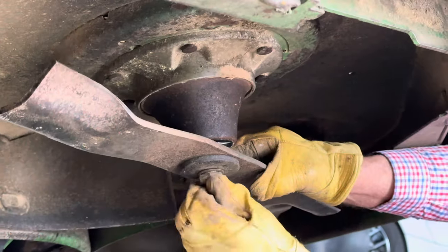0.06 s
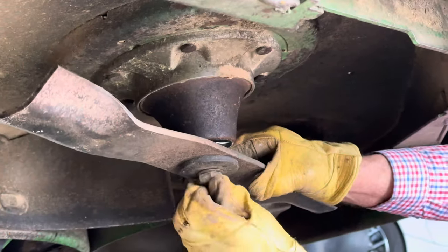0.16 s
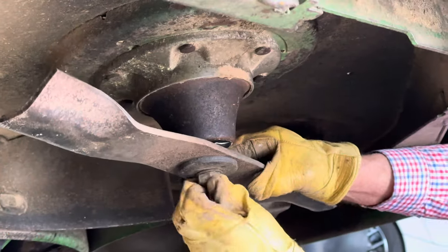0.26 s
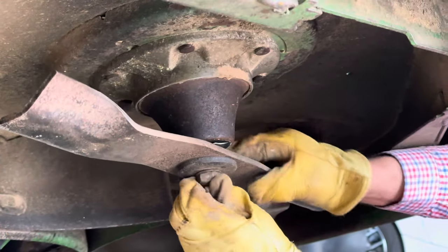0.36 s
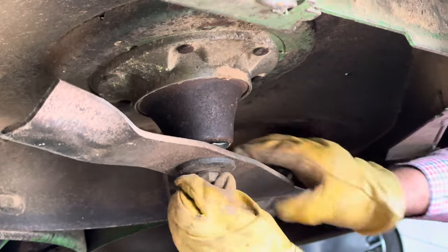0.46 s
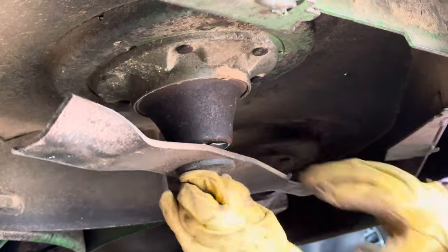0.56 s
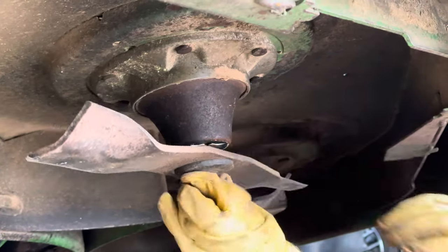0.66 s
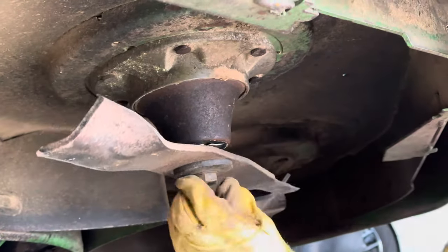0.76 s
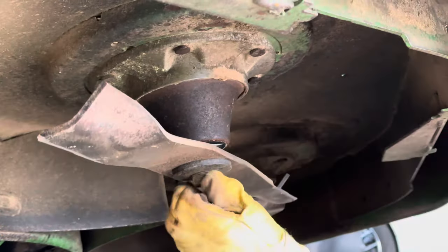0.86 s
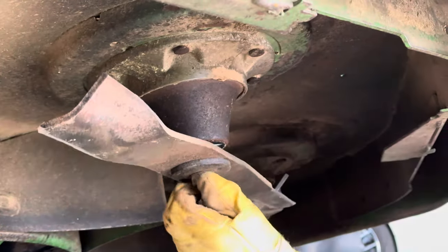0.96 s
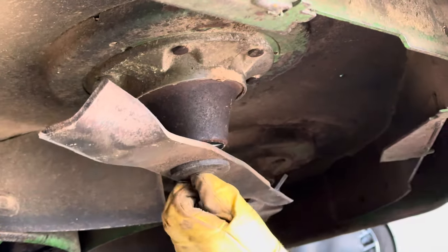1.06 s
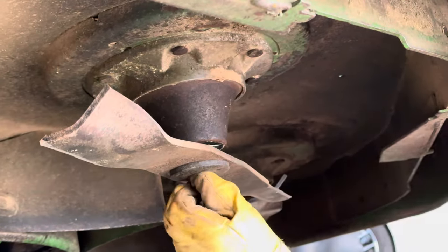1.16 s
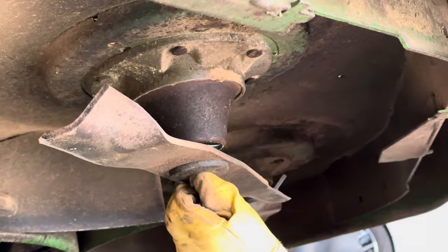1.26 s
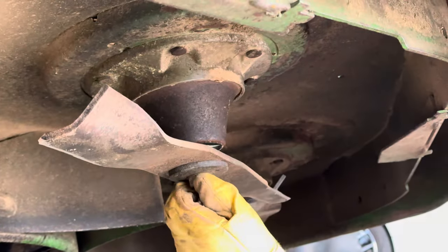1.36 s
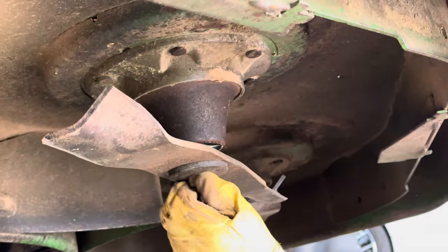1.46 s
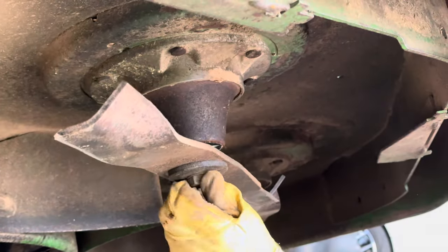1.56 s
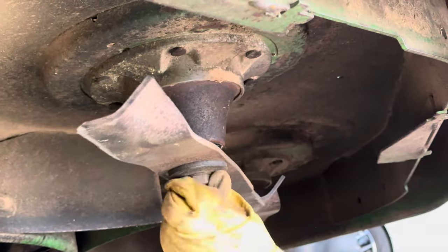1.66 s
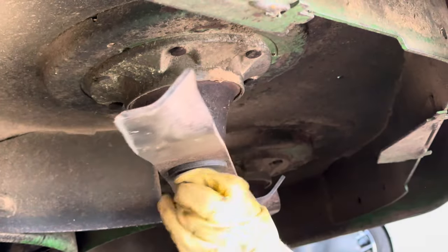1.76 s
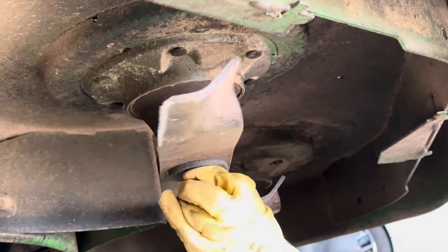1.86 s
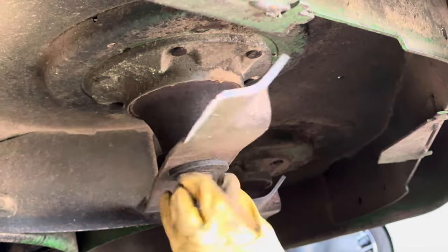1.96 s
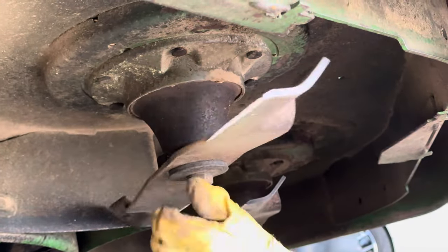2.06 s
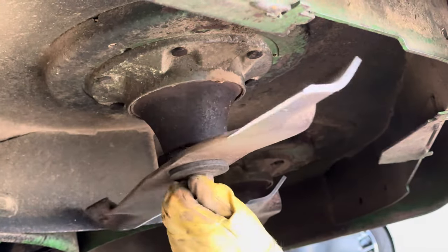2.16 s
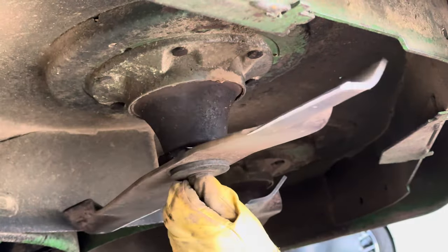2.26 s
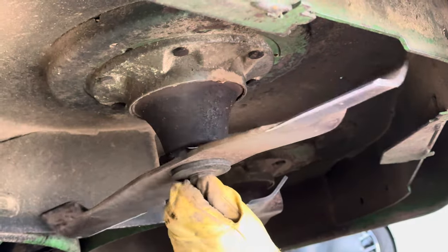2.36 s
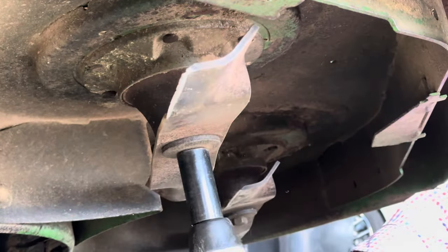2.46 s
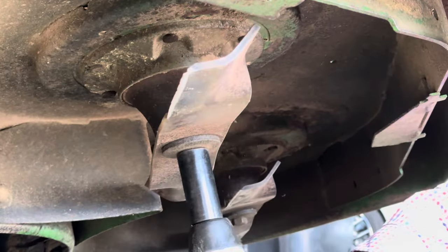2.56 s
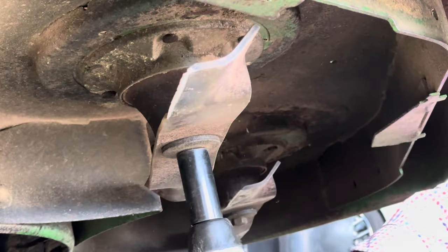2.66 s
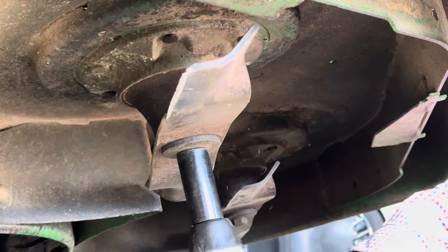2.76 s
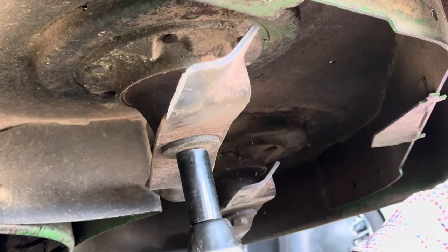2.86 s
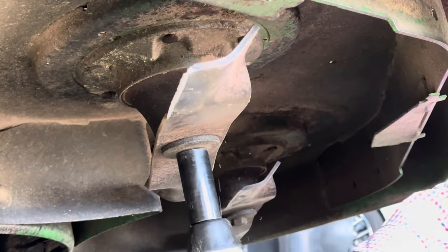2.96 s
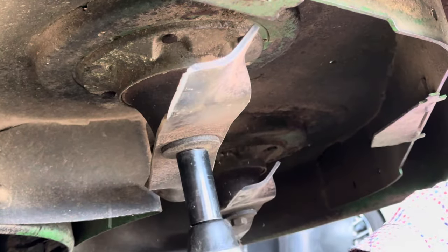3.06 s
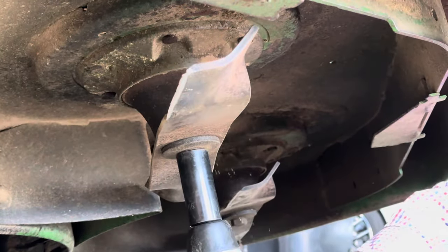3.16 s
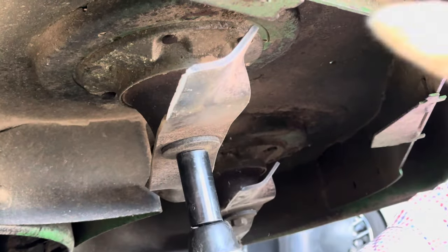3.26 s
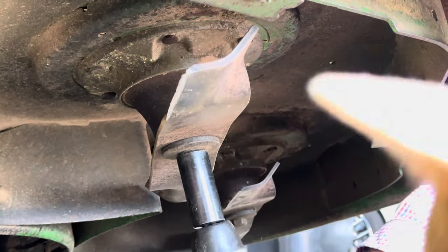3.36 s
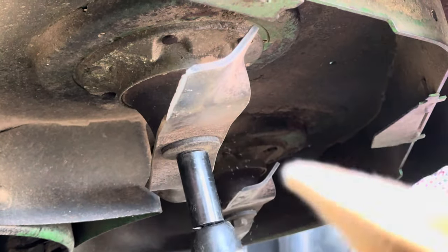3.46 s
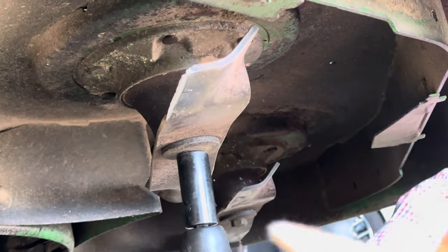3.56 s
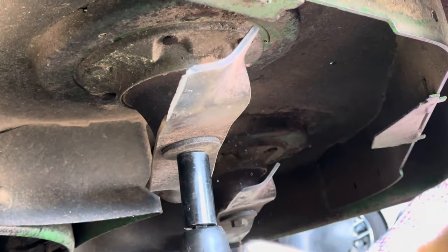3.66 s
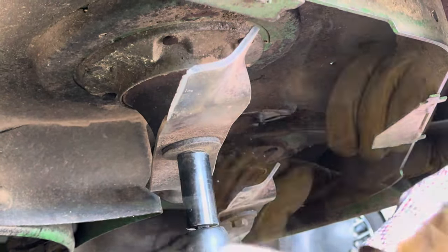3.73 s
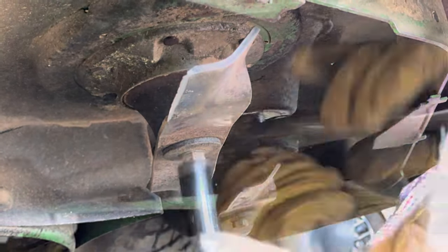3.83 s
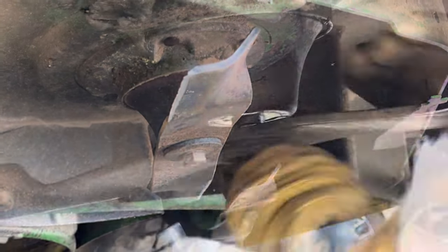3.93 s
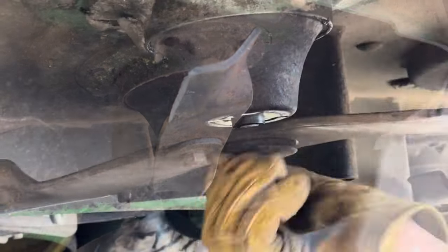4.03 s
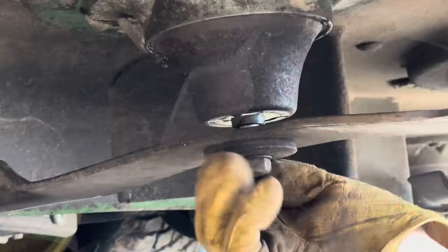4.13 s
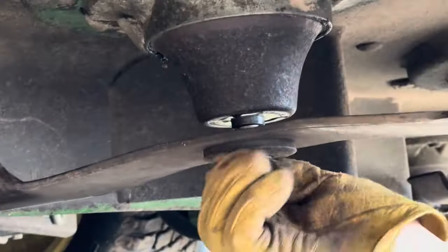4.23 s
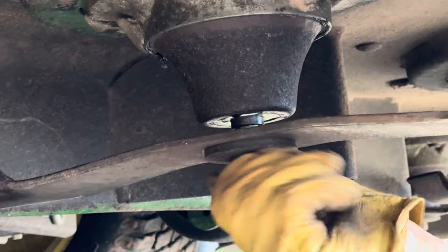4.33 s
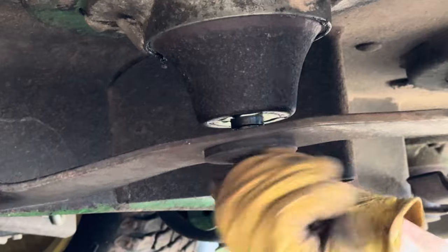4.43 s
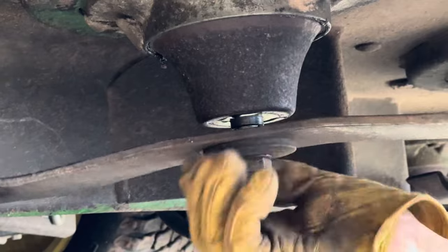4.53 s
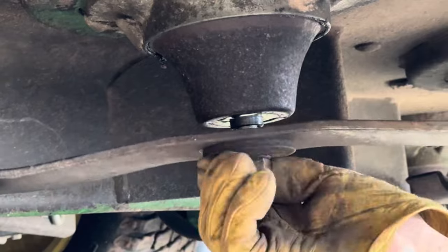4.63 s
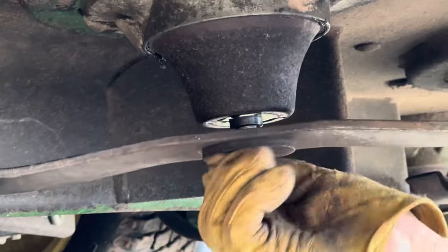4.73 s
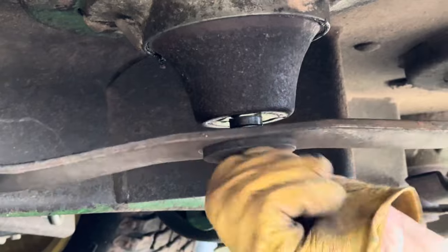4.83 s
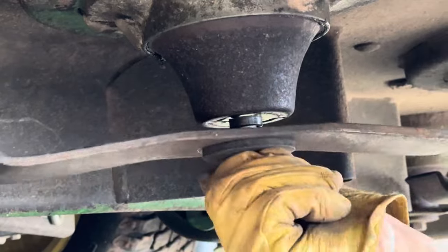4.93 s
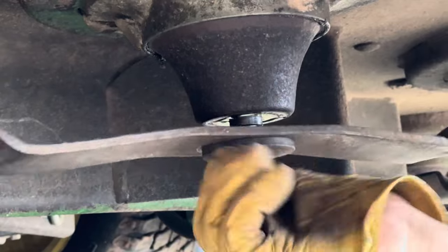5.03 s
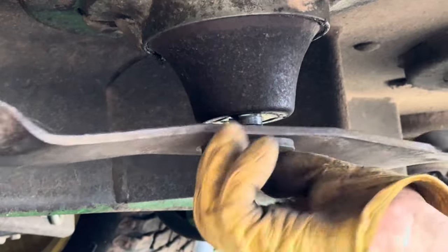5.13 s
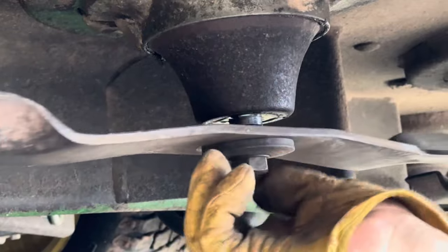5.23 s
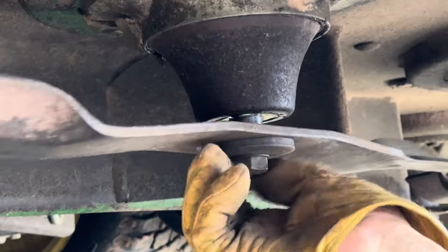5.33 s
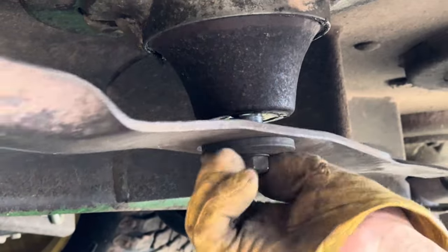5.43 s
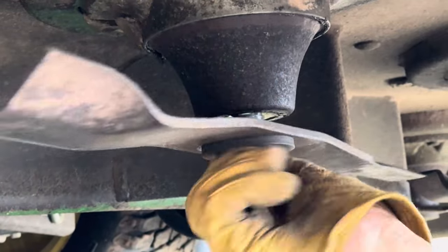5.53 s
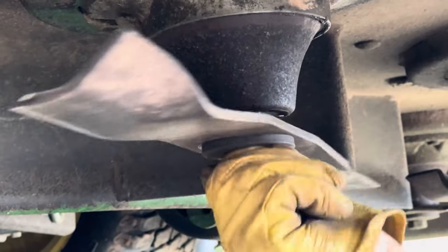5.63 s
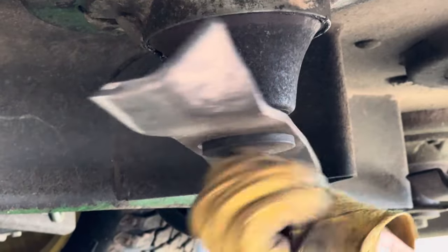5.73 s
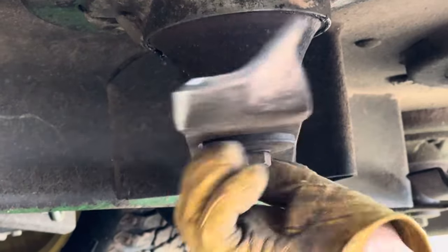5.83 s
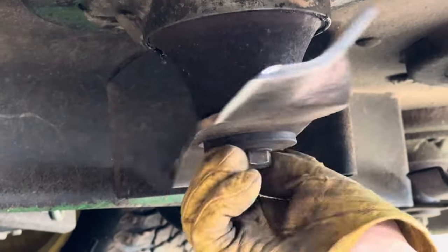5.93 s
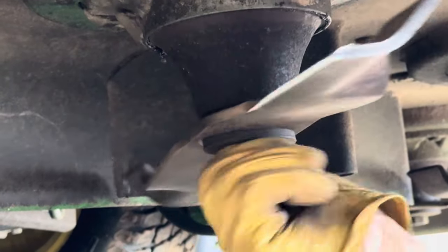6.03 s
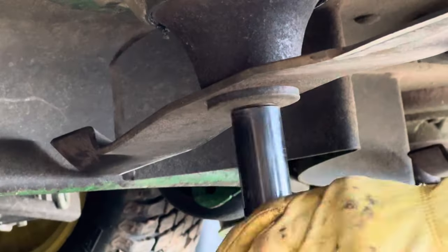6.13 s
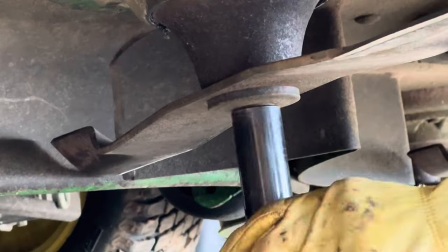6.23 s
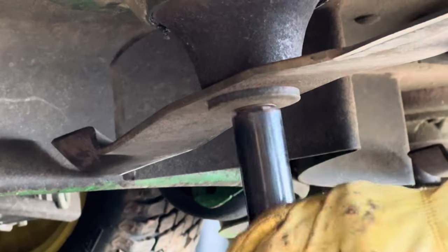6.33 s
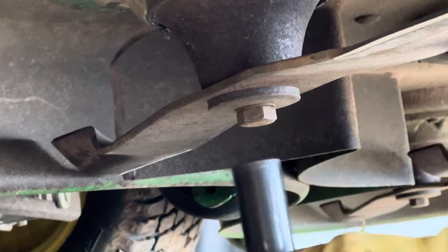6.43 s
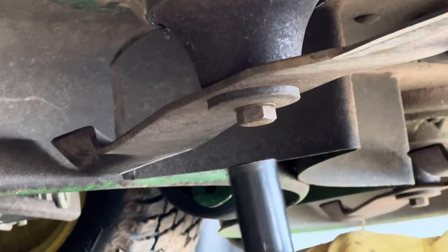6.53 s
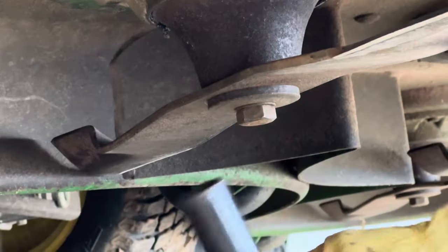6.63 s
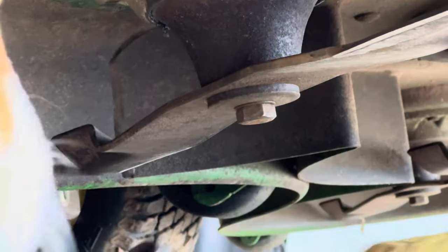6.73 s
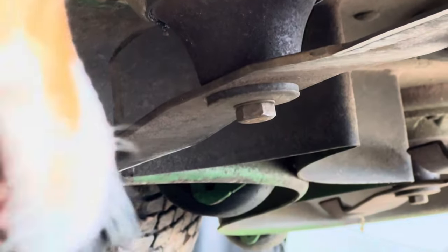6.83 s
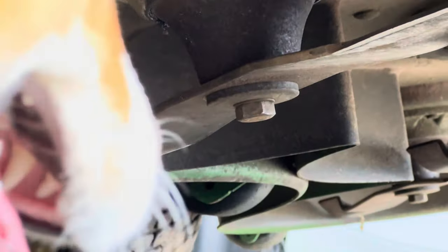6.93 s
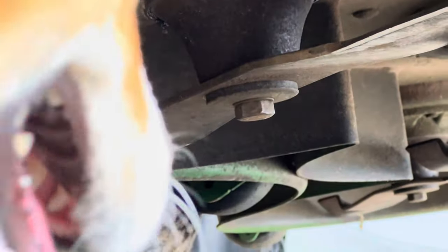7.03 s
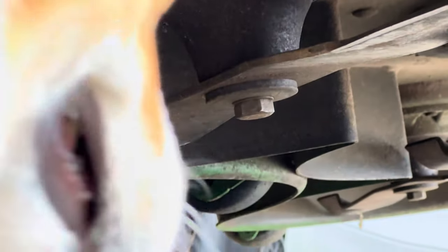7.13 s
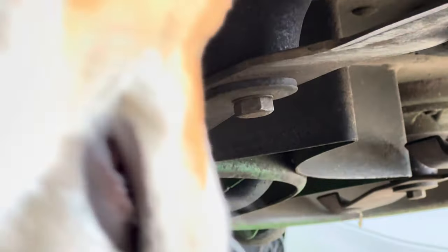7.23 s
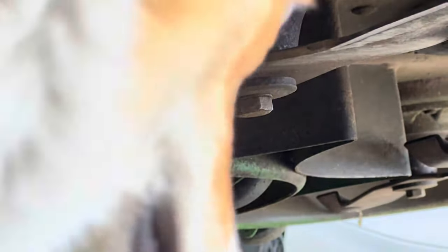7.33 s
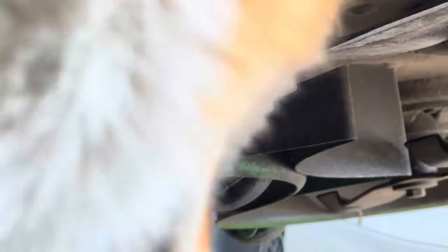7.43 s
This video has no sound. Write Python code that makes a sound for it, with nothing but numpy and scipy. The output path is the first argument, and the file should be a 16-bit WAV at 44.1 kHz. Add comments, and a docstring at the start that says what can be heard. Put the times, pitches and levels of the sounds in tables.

```python
"""Gloved hands rub and bump under a mower deck in a farm workshop, threading on two blade bolts one after the other.
Friction is random stick-slip clicks; the blades scrape and ring, padded knocks and steel clicks are decaying noise.
An air impact wrench tightens each bolt: its vane motor puffs and hisses, stalls at every hammer blow, and socket and
deck ring as decaying sines. The socket clicks off, a dog brushes up to the microphone, and the building echoes.
A low rumble lies under the threading, and a faint bed of outdoor air under everything."""
import sys
import numpy as np
from scipy import signal
from scipy.fft import rfft, irfft, next_fast_len
from scipy.io import wavfile
from scipy.ndimage import uniform_filter1d

SR = 44100
rng = np.random.default_rng(int(sys.argv[2]) if len(sys.argv) > 2 else 0)


def to_wav(s):
    """Save 16-bit WAV."""
    ch = np.atleast_2d(s).T  # columns
    pcm = np.round(np.clip(ch, -1, 1) * 32767)  # PCM
    wavfile.write(sys.argv[1], SR, pcm.astype(np.int16))


N = 330309
TIME = np.arange(N) / SR
AGE = TIME[:SR]  # one second, the time since a strike

# trigger pulls of the wrench: (open [s], close [s], first blow [s], blow rate [1/s], then relative levels:
# exhaust [dB], hiss [dB], rattle [dB], socket ring [dB], deck ring [dB])
PULLS = [(2.474, 3.076, 2.4905, 17.3, -2.5, -8, 1.5, -13.5, -20.5),
         (6.175, 6.3, 6.2306, 16.7, -3, -3, -1.5, -21, -29)]
# colour of a bright tap on steel: (frequency [Hz], relative level [dB])
TAP_COLOUR = [(500, -18.5), (2000, -1), (2800, 7), (4000, -5.5), (7000, -9), (15000, -22.5)]


def undb(db):
    """Decibels to gain."""
    return 10 ** (np.asarray(db) / 20)


def unit(x):
    """Scale to rms 1."""
    return x / np.sqrt(np.mean(x ** 2))


def noise():
    """White noise, rms 1."""
    return rng.standard_normal(N)


def curve(rows):
    """Levels of a table (time [s], level [dB]) joined by straight lines."""
    s, level = np.transpose(rows)
    return np.interp(TIME, s, level)


def during(rows):
    """One while a table of times lasts, zero outside."""
    return 1. * ((TIME > rows[0][0]) & (TIME < rows[-1][0]))


def fade(t60):
    """One second of exponential decay, falling 60 dB in t60 seconds."""
    return np.exp(-np.log(1000) * AGE / t60)


def add(out, s, x):
    """Mix x into out from time s."""
    i = int(s * SR)
    out[i:i + len(x)] += x[:N - i]


def response(points, size=4096):
    """Causal (minimum-phase) impulse response that gives unit white noise the spectrum (Hz, dB per Hz)."""
    hz, db = np.transpose(points)
    bins_hz = np.arange(size // 2 + 1) * SR / size
    log_gain = np.log(undb(np.interp(np.log(bins_hz + 1), np.log(hz), db)))
    # folding the cepstrum onto positive time makes the response causal
    cepstrum = irfft(log_gain)
    cepstrum[1:size // 2] *= 2
    cepstrum[size // 2 + 1:] = 0
    return irfft(np.exp(rfft(cepstrum))) * np.sqrt(SR / 2)


def through(x, h):
    """Pass x through an impulse response."""
    return signal.oaconvolve(x, h)[:N]


def tint(x, points):
    """Colour white x and keep its power."""
    h = response(points)
    return through(x, h / np.linalg.norm(h))


def ring(modes, scatter_db=0, detune=0):
    """One strike of a set of decaying sine modes, scattered in strength and pitch when asked."""
    chance = rng.standard_normal((len(modes), 2))
    out = 0
    for (hz, db, t60), (strength, pitch) in zip(modes, chance):
        tone = np.sin(2 * np.pi * hz * (1 + detune * pitch) * AGE)
        out = out + undb(db + scatter_db * strength) * fade(t60) * tone
    return out


def burst(t60):
    """A contact: dense rattle that dies away."""
    return rng.standard_normal(SR) * fade(t60)


def walk(rate):
    """Random levels held 1 / rate s and slewed twice; spread near 1."""
    k = int(SR / rate)
    steps = np.repeat(rng.standard_normal(N // k + 1), k)
    return 1.2 * uniform_filter1d(uniform_filter1d(steps, k), k)[:N]


def slips(per_s, spread_db):
    """Stick-slip friction: tiny clicks of uneven size at random moments, rms 1."""
    moments = rng.random(N) < per_s / SR
    return unit(moments * noise() * undb(spread_db * np.clip(noise(), -2, 2)))


def bounces(x, t60):
    """Dense quick reflections inside the deck smear x and keep its power."""
    h = burst(t60)
    return through(x, h / np.linalg.norm(h))


def gesture(start, length, attack, release):
    """Gain that rises, holds, and dies away once its length is over."""
    rise = np.clip((TIME - start) / attack, 0, 1)
    return rise * np.exp(-np.maximum(TIME - start - length, 0) / release)


def hands():
    """Glove strokes and the dog's muzzle: soft friction, small catches and a fine hiss, with a low rumble."""
    # glove strokes on bolt and blade: (start [s], length [s], friction [dB], leather hiss [dB]), relative levels
    strokes = [(0.043, 0.21, -52.5, -60), (0.283, .19, -56.5, -53), (0.503, 0.042, -51.5, -49),
               (.68, 0.14, -70, -66), (1.053, 0.16, -50.5, -60.5), (1.304, 0.17, -54.5, -87),
               (1.463, 0.084, -54, -69), (1.609, 0.23, -44, -55), (1.922, 0.039, -56, -55.5),
               (2.032, 0.048, -45.5, -66), (2.136, 0.16, -57, -60), (3.785, 0.11, -49, -57),
               (3.921, 0.042, -56, -50.5), (4.089, 0.16, -58, -61), (4.245, 0.12, -44.5, -53),
               (4.434, 0.34, -57, -56.5), (4.727, 0.21, -47, -56.5), (4.969, 0.2, -45, -53.5),
               (5.217, 0.15, -46.5, -56.5), (5.398, 0.23, -46, -56), (5.7, 0.22, -53.5, -55.5),
               (5.977, 0.084, -41.5, -53.5)]
    # the dog's muzzle brushing the microphone: (start [s], length [s], friction [dB], fur hiss [dB]), relative
    nuzzles = [(7.02, .09, -71, -67.5), (7.193, .16, -61, -62.5), (7.374, 0.14, -49.5, -53)]
    # low rumble while each bolt is threaded on, one table a bolt: (time [s], relative level [dB])
    rumble_levels = [
        [(0.0, -54.5), (0.2, -51.5), (0.78, -56.5), (1.0, -45), (1.14, -59.5), (1.79, -45), (2.42, -56)],
        [(3.62, -53), (3.76, -67.5), (4.44, -47), (4.71, -56), (4.82, -45), (5.87, -57), (6.15, -46.5)],
    ]
    # colour of the low rumble: (frequency [Hz], relative level [dB])
    rumble_colour = [(20, -8), (40, -16.5), (62, 2), (80, 0), (115, 4.5), (170, -7), (260, -11), (600, -62)]
    # colour of soft friction: (frequency [Hz], relative level [dB])
    rub_colour = [(80, -33), (220, 8.5), (300, 8), (520, 3), (750, -15.5), (1300, -5.5), (2200, -27),
                  (4000, -39), (10000, -54.5)]
    # colour of grit catching in the bolt thread: (frequency [Hz], relative level [dB])
    thread_colour = [(150, -12), (500, 0), (900, -2), (1500, -6), (2300, -14), (4000, -30), (12000, -48)]
    # colour of the fine leather and fur hiss: (frequency [Hz], relative level [dB])
    leather_colour = [(500, 3.5), (1800, 5.5), (3000, 3.5), (4500, -2.5), (7000, 0.5), (11000, -3),
                      (15000, -1)]
    rub_gain = hiss_gain = 0
    for start, length, rub_db, hiss_db in strokes + nuzzles:
        pressure = gesture(start, length, attack=0.044, release=0.037)
        rub_gain = rub_gain + undb(rub_db) * pressure
        hiss_gain = hiss_gain + undb(hiss_db) * pressure
    rumble_gain = 0
    for rows in rumble_levels:
        soft_edges = uniform_filter1d(during(rows), SR // 20)
        rumble_gain = rumble_gain + undb(curve(rows)) * soft_edges
    rumble = tint(noise(), rumble_colour) * rumble_gain * undb(2.0 + 1.0 * walk(60))
    rub = tint(slips(per_s=1700, spread_db=0), rub_colour) * rub_gain * undb(-2.5 + 2 * walk(35))
    catches = bounces(slips(per_s=70, spread_db=1), t60=.04)
    ticks = tint(catches, thread_colour) * rub_gain * undb(-10.5)  # they stay under the soft friction
    leather = tint(slips(per_s=6900, spread_db=0), leather_colour) * hiss_gain * undb(-1.77 + 1.6 * walk(30))
    return rumble + rub + ticks + leather


def knocks():
    """Padded bumps on the spindle, and a heavier thud that sounds the hollow deck."""
    # blade and glove bumping the spindle: (time [s], relative level [dB], brightness [dB])
    bumps = [(0.093, -30, -16.5), (0.871, -33.5, -34), (1.525, -25.5, -34), (1.645, -30.5, -30),
             (2.006, -33, -19), (2.057, -30, -38), (2.085, -27.5, -36.5), (3.555, -30.5, -20.5),
             (3.829, -35.5, -12), (4.271, -34.5, -15.5), (4.343, -29.5, -5), (4.81, -28.5, -18.5),
             (5.005, -29, -28), (5.074, -21.5, -26), (5.214, -25, -33), (5.276, -30, -30),
             (5.447, -30, -21), (5.486, -27, -26), (5.99, -27.5, -13.5), (6.098, -21, -27)]
    # hollow thud on the deck: (time [s], relative level [dB])
    thuds = [(.931, -4), (.941, 2.5), (.951, -5), (3.555, -21)]
    # modes of the hollow deck: (frequency [Hz], relative level [dB], t60 [s])
    hollow_modes = [(211, -10, .15), (432, 0, .09), (546, -7, .08), (597, -9, .12), (682, -6, .08),
                    (1133, -9, .1), (1335, -7, .1)]
    # colour of a padded bump: (frequency [Hz], relative level [dB])
    bump_colour = [(40, -10.5), (110, 1), (280, 3), (520, 6), (800, -9.5), (1400, -12.5), (2500, -25.5),
                   (8000, -48.5)]
    # spectrum of a thud at 0 dB: (frequency [Hz], density [dB per Hz])
    thump_spectrum = [(40, -80), (120, -65), (220, -60.5), (450, -45.5), (900, -58.5), (1400, -60),
                      (2400, -75), (4000, -87.5), (8000, -98), (16000, -98)]
    dull, bright, thump, hollow = np.zeros((4, N))
    for s, db, bright_db in bumps:
        add(dull, s, undb(db - 12.5) * burst(0.17))
        add(bright, s, undb(db + bright_db - 9) * burst(0.19))
    for s, db in thuds:
        add(thump, s, undb(db) * burst(0.18))
        add(hollow, s, undb(db - 26.5) * ring(hollow_modes))
    padded = tint(dull, bump_colour) + tint(bright, TAP_COLOUR)
    return padded + through(thump, response(thump_spectrum)) + hollow


def snaps():
    """Grains of grit crack in the thread: very short and bright."""
    # grit snapping: (time [s], level [dB])
    snap_times = [(.492, -42), (3.948, -44), (4.913, -34), (5.207, -33)]
    # colour of a snap: (frequency [Hz], relative level [dB])
    snap_colour = [(500, -18), (3000, -6.5), (6500, 1), (10000, -4), (16000, 6)]
    out = np.zeros(N)
    for s, db in snap_times:
        add(out, s, undb(db) * burst(0.0067))
    return tint(out, snap_colour)


def clicks():
    """Steel touches steel; the freed socket keeps a thin high ring."""
    # small steel clicks: (time [s], relative level [dB])
    click_times = [(.55, -32), (1.516, -12.5), (4.344, -14.5), (6.043, -8.5), (6.436, 3), (6.957, -12.5),
                   (6.978, -18.5), (7.02, -18.5), (7.33, -24.5)]
    # the loose socket rings thinly: (time [s], level [dB])
    thin_rings = [(6.438, -47), (6.978, -56)]
    # spectrum of a click at 0 dB: (frequency [Hz], density [dB per Hz])
    tick_spectrum = [(60, -72.5), (200, -57.5), (900, -63.5), (1700, -64.5), (2800, -64), (4000, -72.5),
                     (7500, -71.5), (11000, -83), (16000, -79)]
    contact, thin = np.zeros((2, N))
    for s, db in click_times:
        add(contact, s, undb(db) * burst(0.057))
    for s, db in thin_rings:
        add(thin, s, undb(db) * ring([(11440, 0, 0.67)]))  # one mode: Hz, dB, t60 s
    return through(contact, response(tick_spectrum)) + thin


def scrapes():
    """The blade sticks and slips on its washer and rings, harder until it slips free."""
    # scrapes: (slip [s], time to swell tenfold [s], relative level [dB])
    scrape_times = [(1.493, 0.026, -53), (1.517, 0.028, -49.5), (1.69, .07, -45.5), (1.804, 0.077, -29),
                    (5.513, 0.026, -42.5), (5.59, 0.078, -48), (6.055, 0.031, -32.5)]
    # modes of the blade: (frequency [Hz], relative level [dB], t60 [s])
    blade_modes = [(2340, -2, .05), (2620, 0, .08), (2980, -3, .05), (3720, -4, .05), (3980, -3, .06),
                   (4880, -5, .07), (5130, -7, .06), (5790, -7, .07), (6050, -6, .07), (6620, -18.5, .5),
                   (10200, -20, .1), (12800, -19, .12), (14000, -23, .12), (14400, -20, .12)]
    release_s = 0.031  # time to fall to a tenth
    pressure = 0
    for s, swell, db in scrape_times:
        decades_down = np.maximum((s - TIME) / swell, (TIME - s) / release_s).clip(0, 10)
        pressure = pressure + undb(db) * 10 ** -decades_down
    grit = pressure * slips(per_s=7000, spread_db=2) * undb(2.2 * walk(130))
    # the contact point travels round the washer, so each mode swells and fades on its own
    blade = sum(through(grit * undb(3 * walk(35)), ring([mode])) for mode in blade_modes)
    blade = blade / np.linalg.norm(ring(blade_modes))
    return undb(-3) * blade + undb(-4.0) * tint(grit, TAP_COLOUR)


def blow_times(pull):
    """The hammer strikes at an even rate until the trigger is let go."""
    _, off, first, per_s = pull[:4]
    return np.arange(first, off, 1 / per_s)


def motor():
    """Vanes let out puffs of air; the rotor stalls at each blow and winds up again the same way."""
    # air under the deck, one table for each bolt: (frequency [Hz], width [Hz], relative level [dB])
    cavities = [
        [(68.7, 15, 1.5), (124, 16.5, 6.5), (178.5, 18, 3.5), (237, 53, -3), (358.5, 128, -2), (465, 56, -1),
         (546, 33, -5), (713, 26, -20.5)],
        [(63, 19, -5), (121, 43, -1.5), (167, 44, 6), (260, 36, -0.5), (392, 65, 1), (465, 34, -2.5),
         (566, 18, -2), (834, 44, 1)],
    ]
    # spectrum of the air jet at 0 dB: (frequency [Hz], density [dB per Hz])
    jet_spectrum = [(200, -71), (700, -65.5), (1400, -77), (2500, -66.5), (6000, -65.5), (11000, -73.5),
                    (16000, -65)]
    stall_hz, vane_gain_hz, recover_s = 74.57, 140.1, .05  # vane rate after a blow, what it regains, how fast
    spin_up_s, jolt_s = 0.013, 0.001  # time for the flow to build; decay of the push a stall gives the air
    stalls = np.concatenate([[pull[0], *blow_times(pull)] for pull in PULLS])
    since = np.abs(TIME - stalls[np.searchsorted(stalls, TIME) - 1])
    regained = since - recover_s * (1 - np.exp(-since / recover_s))
    turns = stall_hz * since + vane_gain_hz * regained
    phase = (turns + .04 * walk(40)) % 1
    puff = np.exp(-phase / 0.26)
    jolt = np.exp(-since / jolt_s)  # each stall checks the air and shakes the tool
    edges = unit(np.diff(puff, prepend=0))
    breath = unit((0.26 + puff) * noise())
    exhaust = undb(-5.5) * edges + undb(0.5) * breath + undb(-0.5) * jolt
    muffler = signal.butter(4, [54, 1400], "band", fs=SR, output="sos")
    out = 0
    for (on, off, _, _, db, hiss_db, *_), cavity in zip(PULLS, cavities):
        valve = (TIME > on) * np.exp(-np.maximum(TIME - off, 0) / 0.016)
        speed = np.clip((TIME - on) / spin_up_s, 0, 1)
        flow = valve * speed * undb(db) * exhaust
        boom = 0
        for hz, width, gain_db in cavity:
            boom = boom + undb(gain_db) * signal.lfilter(*signal.iirpeak(hz, hz / width, fs=SR), flow)
        boom = signal.sosfilt(muffler, boom)  # the muffler rounds each puff
        # air spits as soon as the valve opens
        hiss = valve * (0.45 + 0.8 * speed) * undb(hiss_db) * unit(1.1 + puff) * noise()
        out = out + undb(-5.5) * boom + through(hiss, response(jet_spectrum))
    return out


def hammer():
    """Each blow cracks, rattles through blade and deck, and rings socket and deck."""
    # the hammer grazes the anvil while the bolt still runs in: (time [s], relative level [dB])
    grazes = [(6.202, -10.5), (6.2624, -15)]
    # modes of the socket: (frequency [Hz], relative level [dB], t60 [s])
    socket_modes = [(2955, 0, .12), (6853, -2, .12), (8794, -4, .2)]
    # modes of the deck: (frequency [Hz], relative level [dB], t60 [s])
    deck_modes = [(501, -14, .5), (1190, -9, .2), (1293, -8, .2), (1460, -2, .22), (1635, -6, .22),
                  (1672, -7, .6), (1745, -6, .25), (1858, 1, .14), (2046, -4, .2), (2600, -21, .4),
                  (3101, -11, .35), (3355, -6, .2), (3640, -6, .2), (4095, -16, .7), (5400, -18, .5),
                  (6400, -9, .2), (6538, -4, .35), (7165, -13, .4), (7515, -8, .15)]
    # sharp first instant of a blow, at 0 dB: (frequency [Hz], density [dB per Hz])
    crack_spectrum = [(300, -63), (1500, -56), (3000, -46), (6000, -53.5), (10000, -50), (13000, -50.5),
                      (16000, -53)]
    # rattle of blade and deck, at 0 dB: (frequency [Hz], density [dB per Hz])
    crash_spectrum = [(100, -81), (300, -55.5), (500, -60.5), (950, -69.5), (1300, -46.5), (1900, -50.5),
                      (2400, -57.5), (3400, -52), (4500, -64), (8000, -52.5), (11000, -77.5), (13000, -65),
                      (16000, -78)]
    blow_db, sag_db_per_s = -2.5, 1.5  # a full blow; the blows weaken as the hose pressure sags
    ring_damp_db_per_s = 11.5  # the tightening bolt damps socket and deck
    wind_up_s = 0.016  # time for the hammer to gather force
    crack, rattle, steel = np.zeros((3, N))
    same_path = burst(0.1)  # every blow runs through the same steel, so part of the rattle repeats
    for pull in PULLS:
        on, *_, rattle_db, socket_db, deck_db = pull
        for s in blow_times(pull):
            held = s - on
            force = undb(blow_db - sag_db_per_s * held) * (1 - np.exp(-held / wind_up_s))
            add(crack, s, force * burst(0.045))
            add(rattle, s, force * undb(rattle_db) * (same_path + undb(0.5) * burst(0.12)))
            socket = undb(socket_db) * ring(socket_modes, scatter_db=1.5, detune=.001)
            deck = undb(deck_db) * ring(deck_modes, scatter_db=3, detune=.004)
            add(steel, s, force * undb(-ring_damp_db_per_s * held) * (socket + deck))
    for s, db in grazes:
        add(crack, s, undb(db) * burst(0.04))
    return through(crack, response(crack_spectrum)) + through(rattle, response(crash_spectrum)) + steel


def squeaks():
    """The dry thread sings on one wavering pitch that creeps upward."""
    # squeaks of the bolt thread: (start [s], length [s], starting pitch [Hz], mean level [dB])
    squeak_times = [(3.998, 0.206, 7080, -58), (5.498, 0.037, 5030, -48.5)]
    rise_hz_per_s = 750
    out = 0
    for start, length, hz, db in squeak_times:
        pitch = hz + rise_hz_per_s * np.clip(TIME - start, 0, length)
        waver = 1 + .012 * walk(400) + .008 * walk(35)
        tone = np.sin(2 * np.pi * np.cumsum(pitch * waver) / SR)
        out = out + tone * undb(db + 3 * walk(50)) * gesture(start, length, attack=0.016, release=0.03)
    return out


def echo():
    """Diffuse response of the building: noise bands that each decay at their own rate, the top by far the fastest."""
    # echo of the building: (band centre [Hz], t60 [s], relative level [dB])
    room = [(90, 2.4, -14.5), (250, 0.66, -10), (550, 1.09, -13), (980, 1.01, -11.5), (1600, 1.36, -19),
            (3430, 1.2, -21), (7000, 1.06, -20), (12700, 0.11, -7)]
    log_hz = np.log(np.arange(SR // 2 + 1) + 1.)
    centres = np.log(np.array(room)[:, 0])
    white, h = rfft(rng.standard_normal(SR)), 0
    for share, (_, t60, db) in zip(np.eye(len(room)), room):
        tail = fade(t60) * np.clip(AGE / 0.0032, 0, 1)
        band = irfft(white * np.interp(log_hz, centres, share), SR)
        h = h + undb(db) * band * tail / np.linalg.norm(tail)
    return h


def scene():
    """All sources sit close in front, lows a little left; only the echo and the outdoor air have width."""
    # spectrum of the outdoor air: (frequency [Hz], density [dB per Hz])
    air_spectrum = [(25, -100), (70, -84), (130, -89.5), (400, -91.5), (1000, -102), (3000, -107),
                    (8000, -113), (16000, -114)]
    # diffuse sound that differs between the two ports: (frequency [Hz], relative level [dB])
    width_levels = [(60, -16.5), (300, -10.5), (800, -1.5), (1500, -4.5), (2500, -27.5), (6000, -20.5),
                    (9000, -23), (16000, -5)]
    near = hands() + knocks() + snaps() + clicks() + scrapes() + motor() + hammer() + squeaks()
    air = response(air_spectrum)
    mid = near + through(near, echo()) + through(noise() * undb(walk(2)), air)
    diffuse = through(near, echo()) + through(noise(), air)
    spread = through(diffuse, response(width_levels)) / np.sqrt(SR / 2)
    lean = undb(-23) * signal.lfilter(*signal.butter(1, 900, fs=SR), mid)  # the lows sit a little to the left
    return np.array([mid + spread + lean, mid - spread - lean])


def record(dry):
    """The two ports hear the treble out of phase; loud peaks are rounded, deep bass and top are cut."""
    # phase between the two microphone ports: (frequency [Hz], phase [radians])
    port_phase = [(6200, 0), (7050, .6), (7700, 3.1), (9300, 3.1), (9900, 2.5), (11000, 2.4), (14500, .6),
                  (16000, .3)]
    size = next_fast_len(N + 4096)
    turn = np.interp(np.arange(size // 2 + 1) * SR / size, *np.transpose(port_phase))
    turned = rfft(dry, size) * np.exp(1j * np.array([turn, -turn]) / 2)
    ports = irfft(turned, size)[:, :N]
    ports = signal.sosfilt(signal.butter(2, 42, "high", fs=SR, output="sos"), ports)
    rounded = np.tanh(ports)
    return signal.sosfilt(signal.ellip(10, .2, 70, 15800, fs=SR, output="sos"), rounded)


dry = scene()
out = record(dry)
to_wav(out)
```